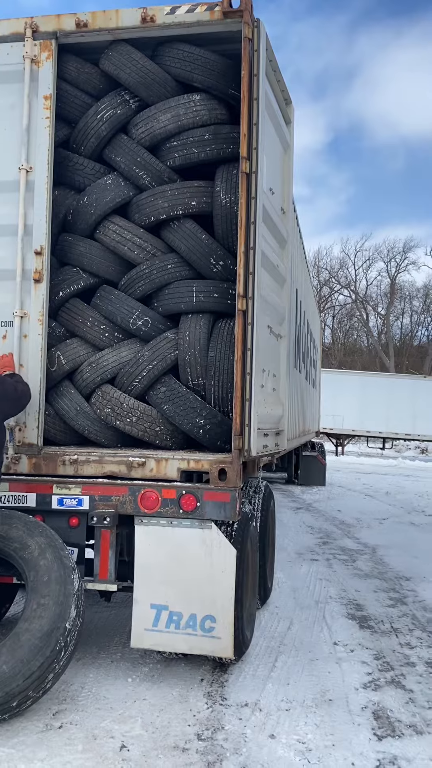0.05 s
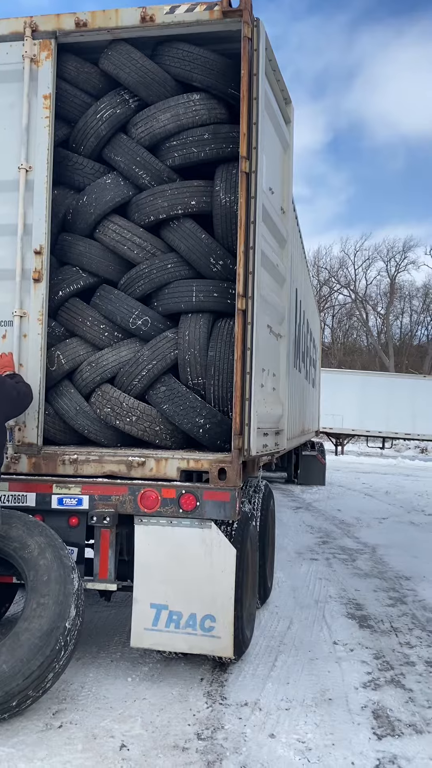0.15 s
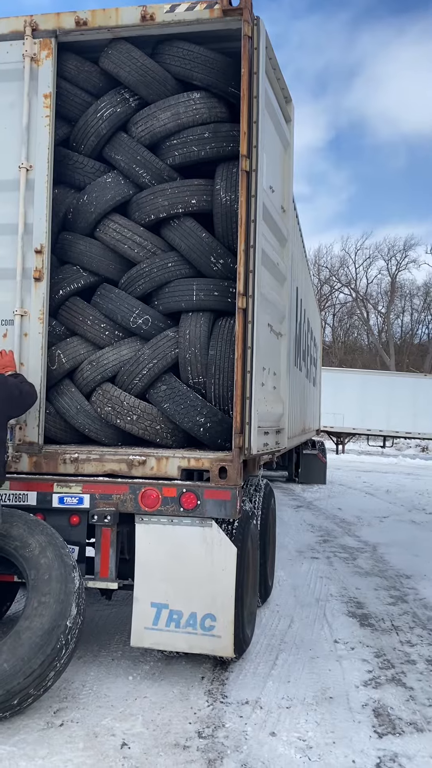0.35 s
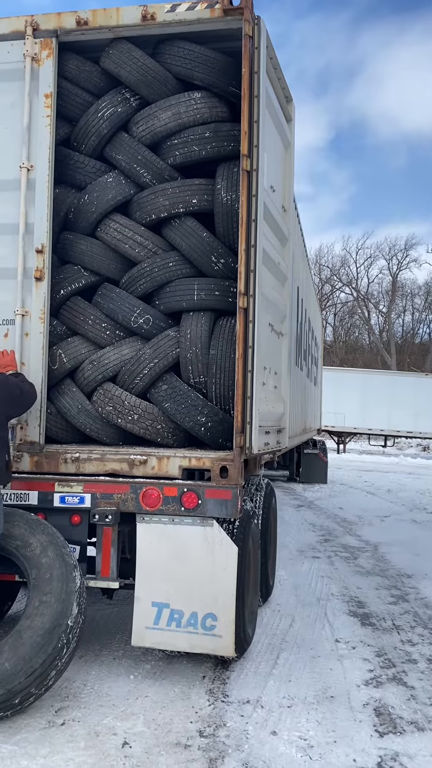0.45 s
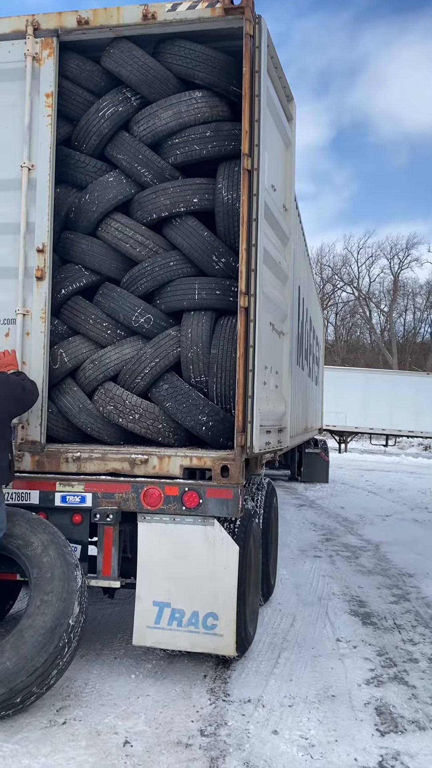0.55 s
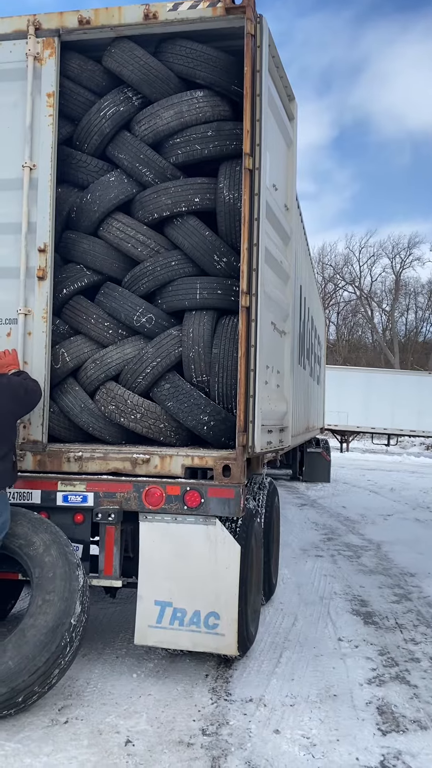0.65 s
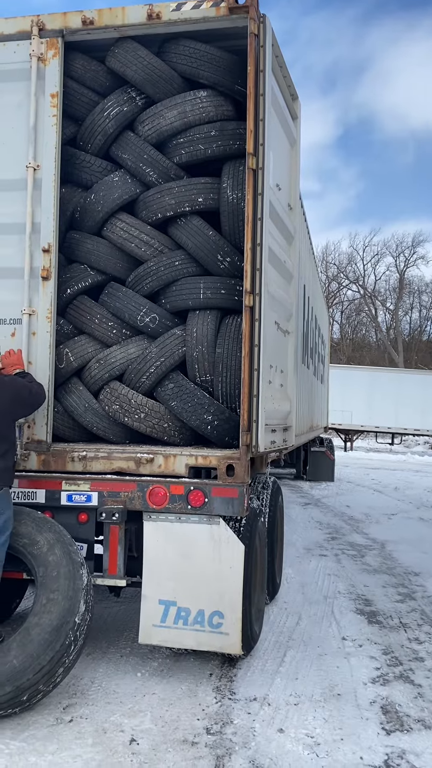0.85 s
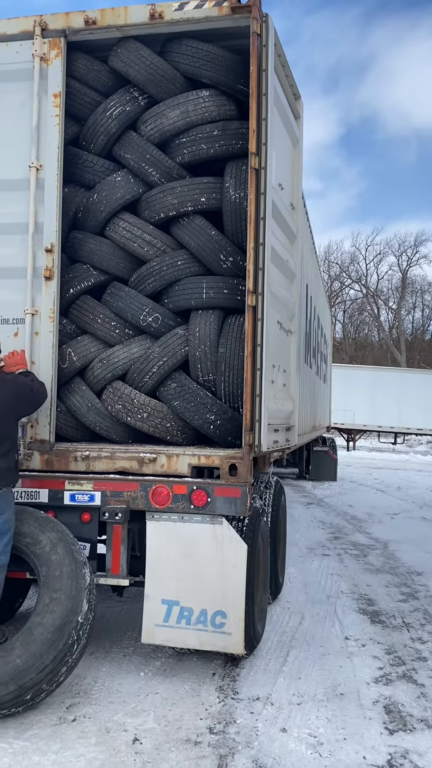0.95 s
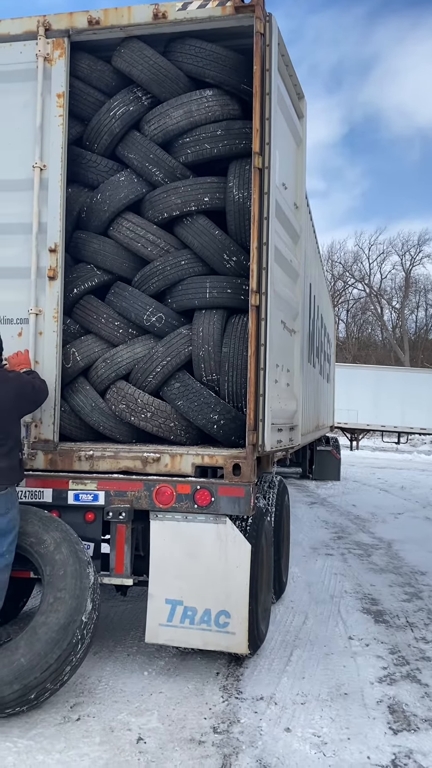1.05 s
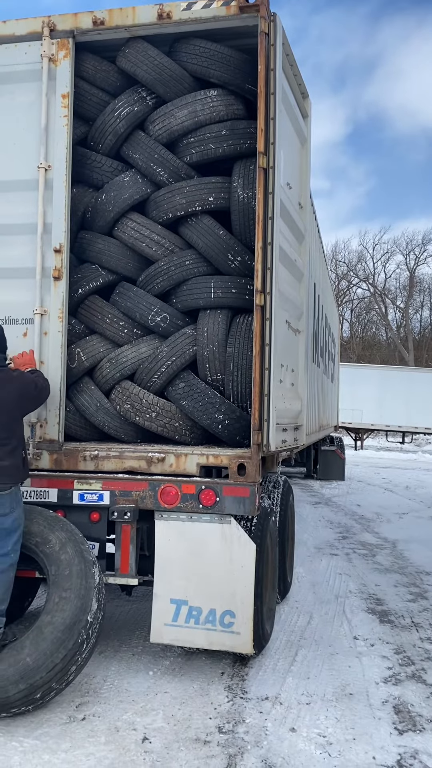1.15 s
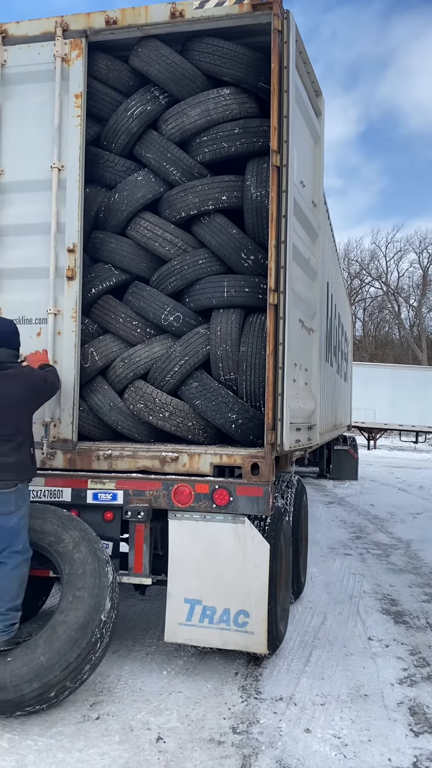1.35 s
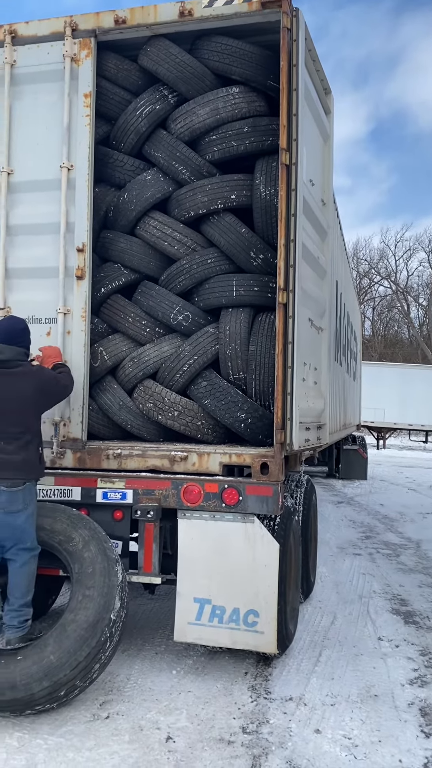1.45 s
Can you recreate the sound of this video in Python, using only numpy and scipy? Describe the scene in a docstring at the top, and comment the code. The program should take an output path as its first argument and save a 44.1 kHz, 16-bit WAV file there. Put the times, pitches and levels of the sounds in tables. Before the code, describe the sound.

Outdoors in a snowy yard, boomy knocks of tires resound in a metal container at some distance; wind buffets the microphone with low thuds, sputters and pops, then eases to faint boot crunches.

```python
"""Over the low hum of a yard, wind on the microphone drops, and tires are shoved into a crowded steel container.
Two bangs ring through the box and die away; the rising gust throbs, and a third bang lands in quick surges.
The gust buffets the microphone with dull thumps, sputters and short pops, then drops away in uneven puffs.
Near the end boots shift faintly on snow. The box and wind are shaped noise with ringing or throbbing tones;
the pops are short pulses, the boots and yard are shaped noise, and a limiter holds down the loudest moments."""
import sys
import numpy as np
from scipy import signal
from scipy.fft import rfft, irfft
from scipy.io import wavfile
from scipy.ndimage import uniform_filter1d

SR = 44100
rng = np.random.default_rng(int(sys.argv[2]) if len(sys.argv) > 2 else 0)


def wrap_up_sound(samples):
    """Save the sound to the file named by the first command line argument, as 16-bit audio."""
    columns = np.atleast_2d(samples).T
    # keep every value between -1 and 1, then stretch to whole-number steps
    tamed = np.clip(columns, -1, 1)
    steps = np.round(tamed * 32767).astype(np.int16)
    wavfile.write(sys.argv[1], SR, steps)


N = 66150
T = np.arange(N) / SR  # time of each sample [s]
HZ = np.fft.rfftfreq(N, 1 / SR)  # pitch of each spectrum line [Hz]
MONO_HZ = 138  # towards the bass below this, left and right become the same

# how alike left and right are for the box echoes and boots: (pitch [Hz], likeness [-1 to 1])
BOX_ALIKE = [(200, 1), (350, 0.86), (600, 0.15), (1300, 0.1814), (3000, 0.13), (12000, 0.6)]
# how alike left and right are for the wind: (pitch [Hz], likeness [-1 to 1])
WIND_ALIKE = [(190, 0.97), (350, 0.66), (600, 0.4)]


def amp(db):
    """Turns decibels into gain."""
    return 10 ** (np.asarray(db) / 20)


def unit(x):
    """Scales a signal to an average (rms) level of 1."""
    return x / np.sqrt(np.mean(x ** 2) + 1e-20)


def read(points, hz):
    """Reads a table between its points, along a logarithmic pitch axis."""
    f, value = np.transpose(points)
    return np.interp(np.log(hz + 1), np.log(f + 1), value)


def pair(spectrum, alike):
    """Left and right spectra of coloured noise; a shared part makes the sides alike, most in the bass."""
    shared, other = rfft(rng.standard_normal((2, N)))
    bass_to_one = HZ ** 4 / (HZ ** 4 + MONO_HZ ** 4)
    # the cosine of this angle is the likeness
    angle = np.arccos(np.clip(read(alike, HZ), -1, 1)) * bass_to_one
    right = np.cos(angle) * shared + np.sin(angle) * other
    return np.array([shared, right]) * amp(read(spectrum, HZ))


def swells(rows):
    """Level curve made of bell-shaped swells."""
    return sum(amp(db) * np.exp(-.5 * ((T - at) / length) ** 2) for at, db, length in rows)


def grains(depth_db, size):
    """Uneven level curve from smoothed noise; size is the smoothing in samples."""
    return unit(amp(depth_db * unit(uniform_filter1d(rng.standard_normal(N), size=size))))


def bang(start, db, treble_db, boom_db, ring_db, build, hold, stretch, treble_hz=1200, boom_hz=400):
    """One bang or surge: a faint crack, then echoes build up and die band by band while the steel walls ring."""
    # colour of the box echoes: (pitch [Hz], relative level [dB per Hz])
    box = [(35, -38.5), (65, -1), (120, -1.5), (230, -3), (295, -2), (360, -8), (450, -13), (590, -9),
           (760, -15), (1020, -20.5), (1700, -24.5), (2700, -29.5), (3600, -32), (4200, -36.5), (4800, -44),
           (5500, -37), (8000, -48.5), (10000, -53.5), (12500, -68)]
    # dying of the echoes before the stretch: (pitch [Hz], time to fall by 60 dB [s])
    box_t60 = [(100, 0.38), (300, 0.67), (750, 0.37), (1400, 0.44), (3700, 0.3), (9700, 0.24)]
    # ringing modes of the steel walls: (pitch [Hz], relative level [dB])
    panels = [(110, 0), (236, -2), (342, -8), (576, -14), (712, -9), (750, -7), (780, -9), (914, -17),
              (962, -21), (1083, -21), (1235, -24), (1416, -25), (1523, -25), (1609, -23), (1799, -26)]
    panel_db, panel_ring = -5.5, 1.16  # level of the modes; their decay time relative to the echoes
    crack_db, crack_s = -33.5, 0.0031  # first contact: level relative to the bang, fade time

    age = np.maximum(T - start, 0)
    dying = np.maximum(age - hold, 0) / stretch
    echo = pair(box, BOX_ALIKE)
    echo = echo / irfft(echo, N).std() * ports(HZ)
    treble = treble_db * HZ ** 2 / (HZ ** 2 + treble_hz ** 2)
    bass = boom_db * boom_hz ** 2 / (HZ ** 2 + boom_hz ** 2)
    echo = echo * amp(treble + bass)

    ringing = np.zeros((2, N))
    # split into overlapping bands that add up to the whole; each has its own decay
    for own, (_, t60) in zip(np.eye(len(box_t60)), box_t60):
        band = read([(f, weight) for (f, _), weight in zip(box_t60, own)], HZ)
        ringing += irfft(echo * band, N) * amp(-60 * dying / t60)
    for (hz, mode_db), turn in zip(panels, rng.random(len(panels))):
        fade = amp(-60 * age / (panel_ring * stretch * read(box_t60, hz)))
        tone = (ports(hz) * np.exp(2j * np.pi * (hz * age + turn))).real
        ringing += amp(panel_db + ring_db + mode_db) * fade * tone

    crack_level = (T >= start) * amp(crack_db + treble_db) * np.exp(-age / crack_s)
    crack = crack_level * rng.standard_normal((2, N))
    return amp(db) * ((1 - np.exp(-age / build)) * ringing + crack)


def ports(hz):
    """Level and phase with which the container reaches the left and right microphone port."""
    # (pitch [Hz], left minus right [dB])
    lean = [(130, 0), (350, 2.5), (850, -4.5), (2050, -1.5), (5000, -2), (12000, 1)]
    # (pitch [Hz], how far left leads right [radians])
    lead = [(180, 0), (330, 0.75), (550, -2), (900, 0.26), (1450, -4.5), (2000, -5.5), (4500, -4.5),
            (10000, -4.5)]
    side = np.array([[.5], [-.5]])
    return amp(side * read(lean, hz)) * np.exp(1j * side * read(lead, hz))


def wind():
    """Low, lumpy noise of turbulent air at the microphone, as loud as the gust at each moment."""
    # strength of the wind: (time [s], level [dB])
    gust = [(0, -31.5), (0.12, -68), (0.2, -44), (0.29, -15), (0.37, -22.5), (0.47, -20), (0.56, -16.5),
            (0.65, -20.5), (0.745, -17), (0.82, -13.5), (0.9, -14.5), (0.95, -29), (1.05, -20.5),
            (1.12, -24.5), (1.235, -25.5), (1.27, -43), (1.33, -31.5), (1.5, -47)]
    # colour of the wind: (pitch [Hz], relative level [dB per Hz])
    colour = [(20, -17), (32, -10.5), (48, 1.5), (80, 2), (130, -0.5), (200, -4), (320, -18.5), (500, -25),
              (900, -54.5), (2000, -88.5)]
    lump_db, lump_s = 1.0, 0.012  # depth of the lumps, time they are smoothed over
    lumps = uniform_filter1d(rng.standard_normal(N), int(lump_s * SR))
    lumps = unit(uniform_filter1d(lumps, int(lump_s * SR / 2)))
    rumble = unit(irfft(pair(colour, WIND_ALIKE), N) * amp(lump_db * lumps))
    return amp(np.interp(T, *np.transpose(gust))) * rumble


def boom():
    """Before the gust peaks, the air throbs as one low tone, whose pitch sags and then glides up."""
    # (time [s], level [dB], pitch [Hz])
    throb = [(0.595, -12, 105), (0.61, -19.5, 114.4), (0.623, -5, 141), (0.634, -13, 111.8),
             (0.651, -2, 66.8), (0.67, -17, 78.4), (0.698, -1.5, 115), (0.71, -15, 142),
             (0.728, -11, 175.5)]
    fade_s, octave_db = 0.012, -19  # fade at both ends; level of the tone an octave above
    at, db, hz = np.transpose(throb)
    turns = np.cumsum(np.interp(T, at, hz)) / SR
    outside = np.maximum(np.maximum(at[0] - T, T - at[-1]), 0)
    level = amp(np.interp(T, at, db)) * np.exp(-(outside / fade_s) ** 2)
    octave = amp(octave_db) * np.sin(2 * 2 * np.pi * turns)
    return level * (np.sin(2 * np.pi * turns) + octave)


def flutter():
    """Quick, uneven sputter of air at the ports: grainy noise in short bursts."""
    # (time [s], level [dB], half-width of the swell [s])
    bursts = [(0.536, -28.5, 0.0055), (0.58, -30, 0.009), (0.845, -27, 0.03), (1.12, -29.5, 0.017),
              (1.228, -31.5, 0.009)]
    # (pitch [Hz], relative level [dB per Hz])
    colour = [(80, -34.5), (250, -13), (450, 9), (750, -5.5), (1100, -13.5), (1600, -36), (3000, -54.5)]
    grain = uniform_filter1d(grains(4, size=160), size=60)
    return swells(bursts) * unit(irfft(pair(colour, WIND_ALIKE), N) * grain)


def swirl():
    """Air crossing the microphone sputters, pushing on one port while it pulls on the other."""
    # (time [s], level [dB], half-width of the swell [s])
    bursts = [(0.575, -28, 0.054), (0.627, -23.5, 0.0091), (0.735, -21.5, 0.03), (0.809, -15, 0.0032),
              (0.83, -15.5, 0.017), (0.89, -19.5, 0.028), (0.972, -31, 0.014), (1.09, -37, 0.054),
              (1.33, -42.5, 0.027)]
    # (pitch [Hz], relative level [dB per Hz])
    colour = [(60, -47.5), (150, -14.5), (330, 4), (450, 3), (700, -3.5), (1000, -10.5), (1500, -30),
              (2500, -37.5), (5000, -52), (10000, -67)]
    grain = uniform_filter1d(grains(3, size=200), size=60)
    noise = unit(irfft(rfft(rng.standard_normal(N)) * amp(read(colour, HZ)), N))
    return np.array([[1], [-1]]) * swells(bursts) * noise * grain


def eddy(at, db, hz, narrow, lead):
    """A brief drop of pressure, highs first and lows after, as an eddy passes the two ports."""
    glide, skirt = 2.2, 0.85  # strength of the glide from high to low; how fast the treble falls off
    ratio = HZ / hz + 1e-9
    away = np.log(ratio) + (1 - ratio ** skirt) / skirt  # zero at the main pitch, negative around it
    # the lead between the ports shrinks towards the bass
    apart = lead * np.array([[.5], [-.5]]) * HZ ** 2 / (HZ ** 2 + MONO_HZ ** 2)
    pop = irfft(np.exp((narrow - 1j * glide) * away + 1j * apart - 2j * np.pi * HZ * at), N)
    return -amp(db) * pop / abs(pop).max()


def boots():
    """Packed snow gives soft crunches: shaped noise with a fast, grainy level."""
    # (time [s], level [dB], half-width of the swell [s])
    scuffs = [(1.005, -55, 0.015), (1.052, -58.5, 0.015), (1.12, -61.5, 0.008), (1.26, -59, 0.011),
              (1.373, -61.5, 0.011), (1.46, -62.5, 0.11)]
    # (pitch [Hz], relative level [dB per Hz])
    snow = [(300, -13), (2500, 9.5), (3600, 5), (4800, -4.5), (5900, 1.5), (7500, -9), (11000, -13),
            (13000, -61)]
    return swells(scuffs) * grains(4, size=90) * unit(irfft(pair(snow, BOX_ALIKE), N))


def yard():
    """Steady noise of the yard: its low hum fades while its hiss grows a little."""
    # (pitch [Hz], relative level [dB per Hz])
    colour = [(20, -27.5), (60, 2.5), (110, -1.5), (170, -0.5), (250, -5.5), (330, -10), (500, -21.5),
              (750, -13.5), (1100, -16), (1600, -25), (3000, -40.5), (6000, -50.5), (12000, -60)]
    # (pitch [Hz], left-right likeness [-1 to 1])
    alike = [(230, 1), (400, 0.81), (700, -0.43), (1100, -0.55), (2000, 0.08), (4000, -0.37), (12000, 0.29)]
    level_db, hum_hz = -39.5, 403  # level before the drifts; the hum lies below this pitch
    hum_drift, hiss_drift = -11.5, 2  # [dB per s]
    spectrum = pair(colour, alike)
    whole = irfft(spectrum, N)
    hum = irfft(spectrum / (1 + (HZ / hum_hz) ** 4), N)
    since = T - T.mean()  # time from the middle [s]
    drifting = hum * amp(hum_drift * since) + (whole - hum) * amp(hiss_drift * since)
    return amp(level_db) * drifting / whole.std()


def scene():
    """Container, boots and yard at a distance; wind right at the microphone."""
    # two bangs, then the quick surges of a third: (time [s], level [dB], treble [dB], boom [dB],
    # wall ring [dB], build-up [s], hold [s], decay stretch [times])
    bangs = [(0.221, -12.5, 2.5, -2, -2, 0.014, 0.031, 0.97),
             (0.423, -15, -8, -10, 3.5, 0.0054, 0.044, 0.8),
             (0.712, -18, -19.5, 2.5, -5, 0.0017, 0.066, 0.57), (0.734, -11, 0, -9.5, 0, 0.0059, 0.036, 1),
             (0.800, -13, -2.5, -8, 3, 0.0024, 0.025, 0.88)]
    # eddies that hit the microphone: (time [s], peak level [dB], main pitch [Hz],
    # narrowness [no unit], lead of the left port above the bass [radians])
    eddies = [(0.144, -15, 90, 5.3, 0), (0.298, -11.5, 190, 2.7, 0.12), (0.334, -7, 148, 3.6, 0),
              (0.5484, -3.5, 210, 1.98, -0.34), (0.566, -11.5, 84, 6.5, 0.19), (0.64, -8, 195, 12, -0.98),
              (0.692, -28, 500, 27, 0.49), (0.719, -10.5, 190, 8, 0.65), (0.783, -7, 118, 27, 0.66),
              (0.831, -2, 63, 9.4, 0), (0.8853, -4.5, 406, 19.4, 0.57), (0.911, -1.5, 59.3, 8.3, -0.11),
              (0.975, -13, 101.7, 4.8, -0.22), (1.0197, -15, 452, 5.5, 0.91),
              (1.0302, -26.5, 330, 3.6, -0.052), (1.054, -15, 172, 3.4, 0), (1.0876, -11, 380, 9.4, 0.23),
              (1.0965, -9.5, 310, 2.5, 0.03), (1.111, -13, 254, 2.8, -0.028), (1.128, -10, 170, 9.6, 0.48),
              (1.142, -21.5, 678, 6.2, 1), (1.157, -15.5, 208, 7.7, 0), (1.201, -23, 310, 7.8, 0),
              (1.2161, -27.5, 1340, 17, 0.05), (1.218, -7.5, 476, 7.9, 0.23), (1.299, -30.5, 484, 47, 1),
              (1.311, -20, 120, 6.9, -2), (1.373, -25, 270, 12.4, 0)]
    far = yard() + boots() + sum(bang(*row) for row in bangs)
    return far + wind() + boom() + flutter() + swirl() + sum(eddy(*row) for row in eddies)


def record(dry):
    """A limiter ducks loud moments and recovers steadily; peaks are rounded and the top treble is cut."""
    limit_db, slope, recover = -12.5, 0.42, 81  # threshold; dB ducked per dB over it; recovery [dB per s]
    ceiling, edge_hz = 0.92, 12600  # level where peaks are rounded; upper pitch limit
    power_db = 10 * np.log10(abs(uniform_filter1d((dry ** 2).mean(0), size=400)) + 1e-12)
    # follow each rise in level at once, then sink at the recovery speed
    fall = T * recover
    held_db = np.maximum.accumulate(power_db + fall) - fall
    over_db = np.maximum(held_db - limit_db, 0)
    ducked = dry * amp(-slope * uniform_filter1d(over_db, size=200))
    rounded = ducked / (1 + (ducked / ceiling) ** 8) ** (1 / 8)
    low_pass = signal.firwin(511, edge_hz, window=("kaiser", 9), fs=SR)
    return signal.oaconvolve(rounded, low_pass[None], "same")


dry = scene()
out = record(dry)
wrap_up_sound(out)
```